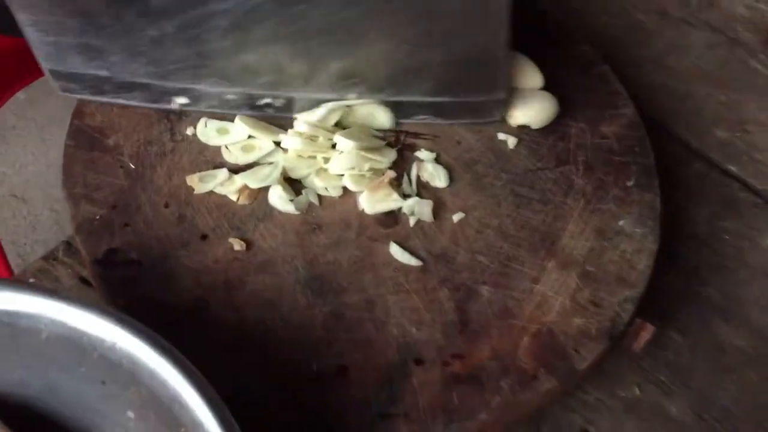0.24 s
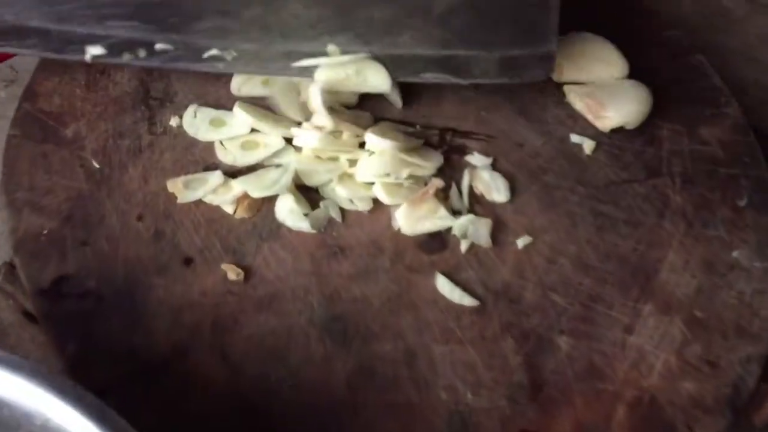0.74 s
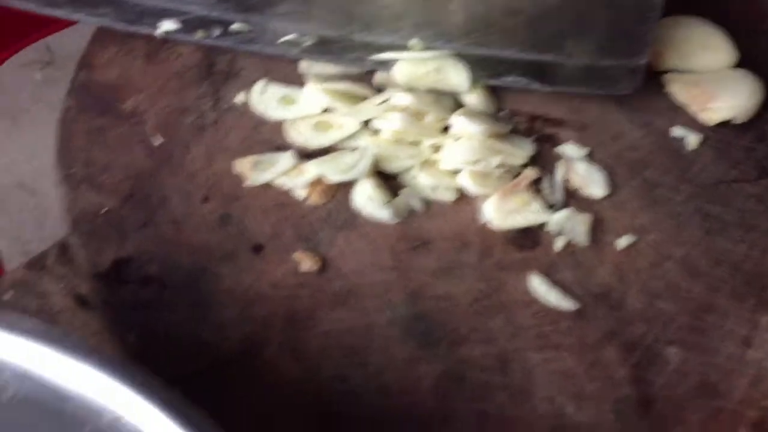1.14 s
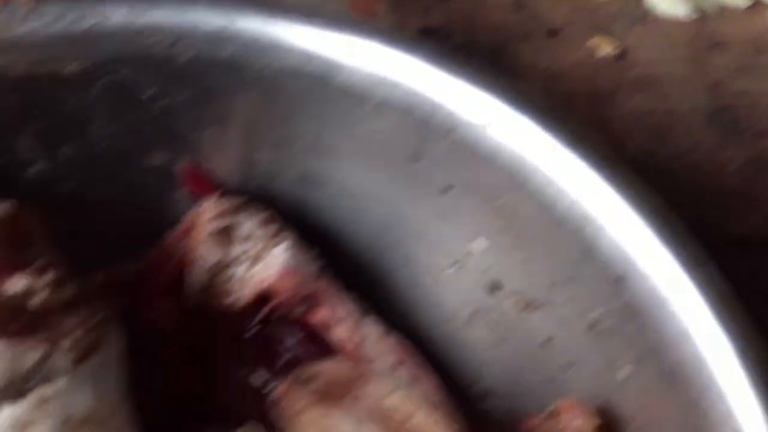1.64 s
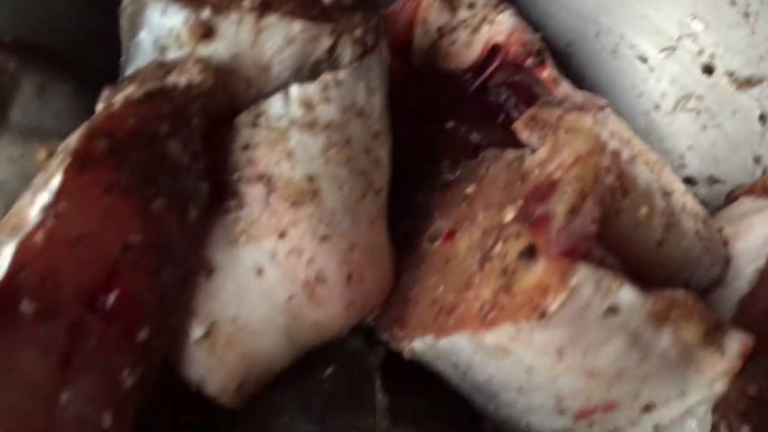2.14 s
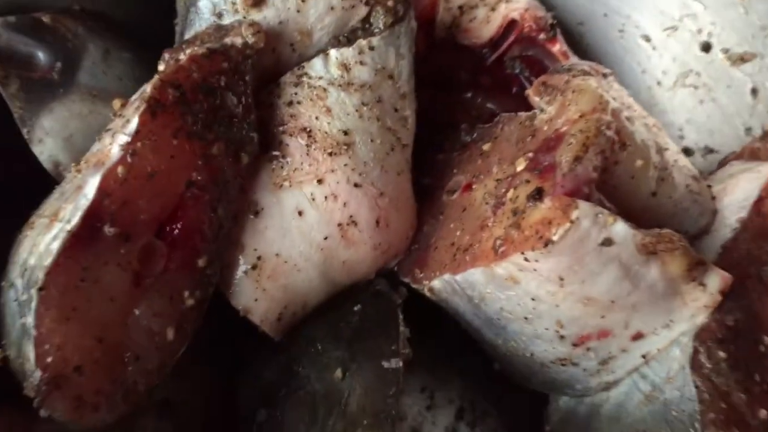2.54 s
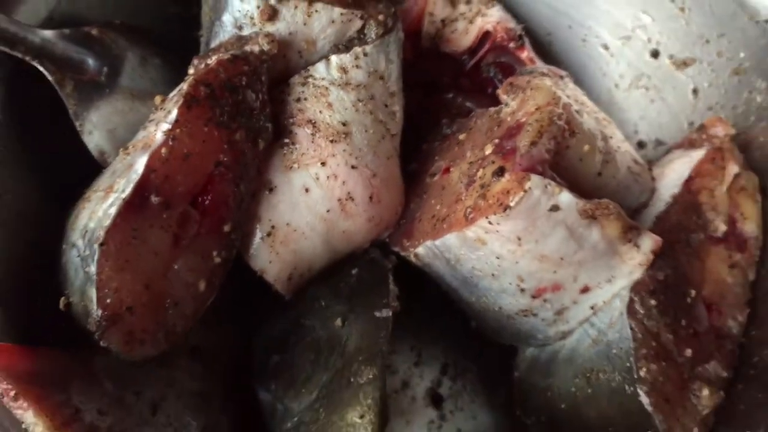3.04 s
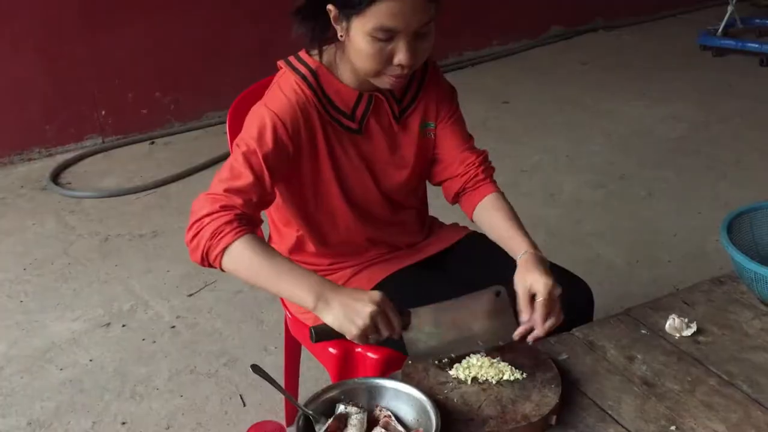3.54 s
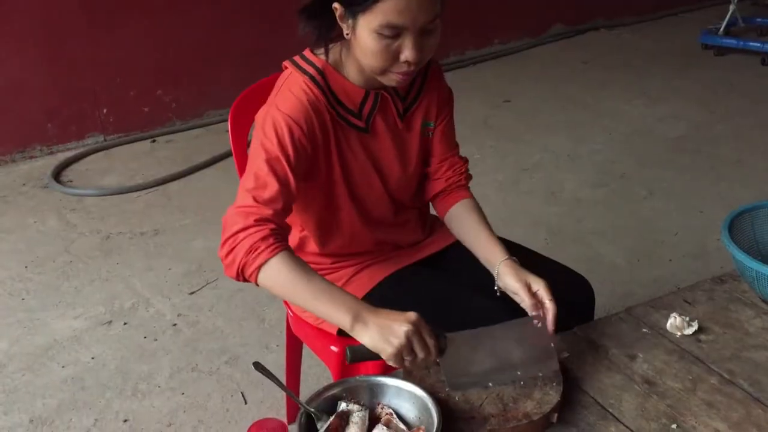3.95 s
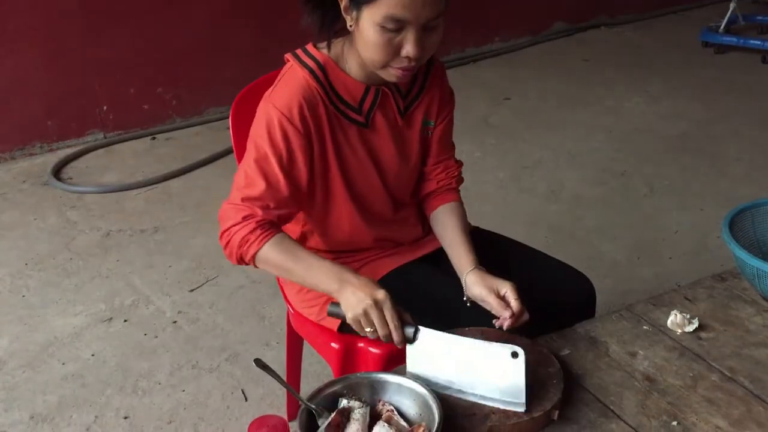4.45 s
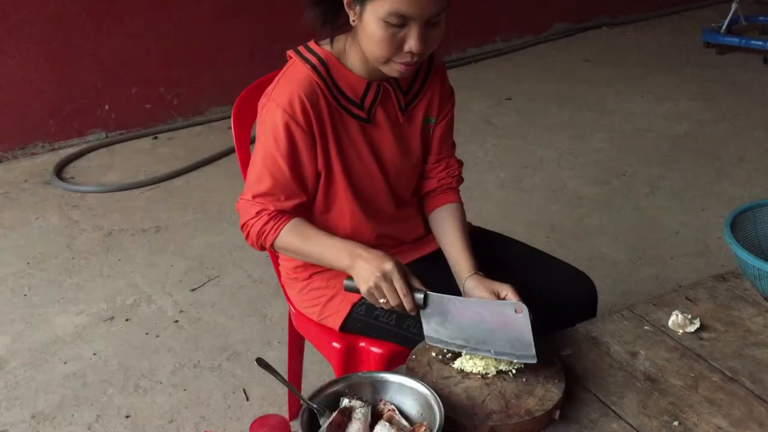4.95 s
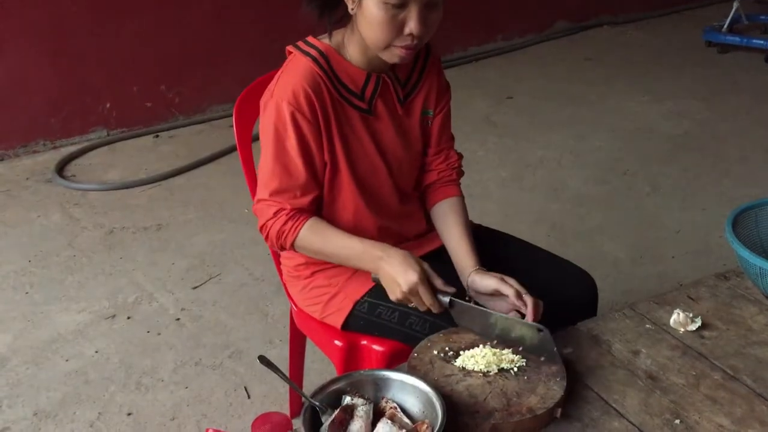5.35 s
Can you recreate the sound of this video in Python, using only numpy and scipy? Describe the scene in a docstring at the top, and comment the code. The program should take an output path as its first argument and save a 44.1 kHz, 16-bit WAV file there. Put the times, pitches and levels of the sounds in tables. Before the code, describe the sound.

A cleaver crunches through garlic and knocks hard on a wooden board while chicks peep constantly, then softer chops and scrapes from farther away.

```python
"""Slicing garlic with a cleaver in an open shed

A steel cleaver crunches through garlic (showers of tiny fractures) and knocks on a round wooden board (ringing modes).
After a moment of silence it is heard from farther off, tapping the board and scraping across it (stick and slip).
Chicks peep and other birds whistle as gliding tones; a distant hen squawks as rough pulses through a throat.
A diffuse echo surrounds them, over a low outdoor rumble and thin air of shaped noise, with a rush that fades away."""
import sys
import numpy as np
from scipy import signal
from scipy.fft import rfft, irfft, next_fast_len
from scipy.io import wavfile
from scipy.ndimage import uniform_filter1d

SR = 44100
rng = np.random.default_rng(int(sys.argv[2]) if len(sys.argv) > 2 else 0)


def master_out(mix):
    """Clip the mix to full scale and print it as 16-bit PCM to the path in sys.argv[1]."""
    frames = np.transpose(np.atleast_2d(mix))
    ceiling = np.clip(frames, -1, 1)
    pcm = np.round(ceiling * 32767).astype(np.int16)
    wavfile.write(sys.argv[1], SR, pcm)


N = 246078
TIME = np.arange(N) / SR
SILENCE_START_S, SILENCE_END_S = 3.370, 3.416

# free ringing tones of the steel blade: [f/Hz, relative level/dB]
BLADE_TONES = [(1023, -53), (1448, -60), (1674, -56), (2309, -64), (2428, -65), (2697, -56), (2955, -67),
               (3138, -56), (3214, -60), (3553, -62), (3723, -60), (4140, -50), (4737, -65), (5604, -69),
               (6471, -71), (6715, -69), (7214, -73), (7827, -71), (7935, -66), (8732, -73), (11190, -80),
               (11680, -79), (12588, -73), (13680, -80)]


def amp(db):
    """Turn decibels into a plain gain."""
    return 10 ** (np.asarray(db) / 20)


def unit(x):
    """Scale to rms 1."""
    return x / np.sqrt(np.mean(x ** 2) + 1e-20)


def at_hz(points, hz):
    """Read a table between its rows, on a log-frequency axis."""
    f, value = np.transpose(points)
    return np.interp(np.log(np.maximum(hz, 1)), np.log(f), value)


def tint(x, spectrum):
    """Boost and cut each frequency as a table says; rms 1."""
    size = next_fast_len(len(x))
    gain = amp(at_hz(spectrum, np.fft.rfftfreq(size, 1 / SR)))
    return unit(irfft(rfft(x, size) * gain, size)[:len(x)])


def noise(spectrum, size=N):
    """Random hiss coloured by a table; rms 1."""
    return tint(rng.standard_normal(size), spectrum)


def wander(rate, size=N):
    """Random drift around 0 with a spread of about 1: straight lines between `rate` random points a second."""
    steps = np.arange(size) / SR * rate
    return np.interp(steps, np.arange(4096), rng.standard_normal(4096))


def decay(t, t60):
    """Dying away by 60 dB in t60 seconds."""
    return np.exp(-np.log(1000) * t / t60)


def add(track, s, sound):
    """Lay a sound into a track at a time in seconds."""
    i = round(s * SR)
    part = sound[max(-i, 0):max(N - i, 0)]
    track[max(i, 0):max(i, 0) + len(part)] += part


def resonate(x, hz, width):
    """Two-pole resonance, width in Hz, with gain 1 on top."""
    r = np.exp(-np.pi * width / SR)
    feedback = [1, -2 * r * np.cos(2 * np.pi * hz / SR), r * r]
    return signal.lfilter(np.array([1, 0, -1]) * (1 - r * r) / 2, feedback, x)


def grains(per_s, spread_db):
    """Tiny fractures at random moments and of uneven size; rms 1."""
    hits = rng.random(N) < per_s / SR
    size = rng.standard_normal(N) * amp(spread_db * np.minimum(rng.exponential(1, N), 4))
    return unit(hits * size)


def stroke(s, hold_s, attack_db_per_s, release_db_per_s):
    """Gain that rises until s, holds at 1 and is released."""
    before_s = np.maximum(s - TIME, 0)
    after_s = np.maximum(TIME - s - hold_s, 0)
    return amp(-attack_db_per_s * before_s - release_db_per_s * after_s) + 1e-12


def chops(wood_t60=0.092, steel_t60=0.42, steel_hz=2950, steel_octaves=0.27, contact_s=0.0019,
          bite=1.15, bite_s=0.0064, scatter_db=4, detune=0.0072):
    """Each blow rings the board's modes; where and how hard the edge lands sets their balance and shifts them a little."""
    # edge meets board, a loose blow bouncing once or twice, relative levels:
    # [t/s, low thump/dB, wood knock/dB, ring/dB, crack/dB, free ringing of the steel/dB]
    blows = [(.3310, -20, -23, -20.5, -46, 2), (1.9994, -17, -16.5, -23, -34.5, 3),
             (2.5730, -15, -17, -11, -19.5, -6), (3.2410, -18, -25, -15, -48, -16),
             (3.9780, -38, -31, -43.5, -36, -12), (3.9922, -48, -33.5, -55, -60, -18),
             (4.003, -38, -35, -50, -57, -23), (4.4873, -32.5, -25, -28, -30, -8),
             (4.4945, -39, -30, -31, -49, -18), (5.4724, -33.5, -31.5, -35, -37.5, 12),
             (5.4874, -39, -38.5, -51, -44, -18)]
    # ringing modes of board and stand under the blade: [f/Hz, relative level/dB, time to die by 60 dB/s]
    board_modes = [(109.4, -10.5, 0.16), (202.6, -1.5, 0.044), (274, 2, 0.036), (384, -4, 0.068),
                   (465.5, -6.5, 0.1), (612, -5, 0.06), (657, 2.5, 0.026), (830, -3.5, 0.057),
                   (1015, -3, 0.025), (1098, 4, 0.042), (1177.8, 5, 0.053), (1314, -5, 0.097),
                   (1584, -9, 0.11), (2050, -7, 0.089), (2365, -6.5, 0.053), (2740, -19.5, 0.083),
                   (2840, -8, 0.06)]
    # dense, quickly damped modes of the wood: [f/Hz, relative level per Hz/dB]
    wood_colour = [(60, -17), (200, 2.5), (700, 2.5), (1200, 0.5), (1900, 3), (2600, -1), (4000, -9.5),
                   (7000, -27), (15000, -67)]
    # dense wood modes/dB, room/dB
    close, farther = (-3, -20), (0.32, -11.5)

    near, far, t = np.zeros(N), np.zeros(N), TIME[:SR // 2]
    # the steel rings on faintly: the hand damps its low modes, soft wood hardly wakes the high ones
    steel = 0
    for hz, db in BLADE_TONES:
        woken = np.exp(-(np.log2(hz / steel_hz) / steel_octaves) ** 2)
        steel = steel + amp(db) * woken * np.sin(2 * np.pi * hz * t)
    steel = steel * decay(t, steel_t60)
    # the first swings are the widest, until the edge beds in and damps them
    first_swings = (1 + bite * np.exp(-(t / bite_s) ** 4)) / np.sqrt(1 + bite)
    impact = (1 - np.exp(-t / contact_s)) * first_swings

    for s, thump_db, knock_db, ring_db, crack_db, steel_db in blows:
        wood_db, room_db = close if s < SILENCE_START_S else farther
        balance = [(280, thump_db), (470, knock_db), (850, knock_db), (1150, ring_db), (1900, crack_db)]
        modes = 0
        for hz, db, t60 in board_modes:
            level = amp(db + at_hz(balance, hz) + rng.normal(0, 1))
            modes = modes + level * np.sin(2 * np.pi * hz * rng.normal(1, detune) * t) * decay(t, t60)
        force = np.sqrt(np.mean(amp([knock_db, ring_db, crack_db]) ** 2))
        wood = tint(noise(wood_colour, size=len(t)), balance)
        thud = amp(wood_db) * force * wood * decay(t, wood_t60)
        blow = (modes + thud + amp(steel_db) * steel) * impact
        add(near, s, blow)
        # the dense modes radiate in all directions, so they weigh more in the echo
        add(far, s, (blow + amp(scatter_db) * thud) * amp(room_db))
    return near, far


def slicing(snap_db=9, snap_t60=0.014, burst_db=3, entry_s=0.0097, crackle_db=-2, crackle_t60=0.0033,
            build_db=3, release_db_per_s=796):
    """Garlic cells burst densely ahead of the edge, fibres crackle, and now and then the clove splits with a snap."""
    # edge working through a clove, push by push: [t at the end of the push/s, length/s, relative crunch level/dB]
    pushes = [(0.268, 0.053, -54.5), (0.339, 0.064, -47), (1.81, 0.045, -61), (1.97, 0.15, -54.5),
              (1.993, 0.0079, -41.5), (2.544, 0.036, -55), (2.574, 0.022, -43.5), (3.178, 0.041, -49),
              (3.248, 0.054, -43)]
    # a clove splits: [t/s, relative level/dB]
    splits = [(.2575, -55), (0.2798, -47), (0.2968, -45), (0.332, -38.5), (1.78, -66), (1.875, -51),
              (1.949, -51.5), (1.996, -44.5), (2.559, -59), (3.2046, -42), (3.2245, -49), (3.245, -41)]
    # colour of the crunch: [f/Hz, relative level per Hz/dB]
    crunch_colour = [(300, -5), (800, 2), (1250, 8), (1700, 1.5), (4000, 8.5), (6000, -0.5), (9000, -6.5),
                     (11700, -6.5), (13000, -14), (16000, -19)]

    t = TIME[:SR // 20]
    cells = grains(per_s=5600, spread_db=-4.0) * amp(burst_db * wander(40))
    crackles = signal.fftconvolve(grains(per_s=650, spread_db=8.5), decay(t, crackle_t60))[:N]
    fibres = crackles * rng.standard_normal(N)
    # the crunch grows as the edge sinks in, then dies
    effort = 0
    for s, length, db in pushes:
        entry = np.clip((TIME - s + length) / entry_s + 1, 0, 1)
        effort = effort + amp(db) * stroke(s, 0, build_db / length, release_db_per_s) * entry
    out = effort * tint(unit(cells) + amp(crackle_db) * unit(fibres), crunch_colour)
    for s, db in splits:
        add(out, s, amp(snap_db + db) * noise(crunch_colour, size=len(t)) * decay(t, snap_t60))
    return out


def scraping(rasp_db=7.0, steel_db=62.5, steel_width_hz=16, plate_width_hz=18, stutter_db=2.0, grip=2.3,
             count=110, attack_db_per_s=400, release_db_per_s=707):
    """Stick and slip on the grain drives the blade: a few clear modes sing above many damped ones, new each stroke."""
    # blade dragged over the board: [t/s, length/s, relative friction level/dB]
    drags = [(4.02, 0.12, -66), (4.604, 0.097, -59), (4.754, 0.03, -69), (5.527, .1, -65.5)]
    # colour of the friction: [f/Hz, relative level per Hz/dB]
    friction_colour = [(200, 7), (1000, 9), (2300, 15), (3500, 25), (4600, 26.5), (6500, 29), (8000, 25),
                       (10500, 14), (12000, 1), (13700, -20), (16000, -25)]

    slips = grains(per_s=9000, spread_db=3.0)
    stutter = amp(stutter_db * wander(70))
    out, pressure = np.zeros(N), 0
    for s, length, db in drags:
        push = amp(db) * stroke(s, length, attack_db_per_s, release_db_per_s) * stutter
        during = np.abs(TIME - s - length / 2) < .25
        # damped modes, one at a random pitch in each equal slot from 600 to 15600 Hz
        plate_hz = 600 + 15000 * (np.arange(count) + rng.random(count)) / count
        plate = 0
        for hz in plate_hz:
            gain = rng.choice([-1, 1]) * amp(rng.normal(0, 7.2))
            plate = plate + gain * resonate(slips[during], hz, plate_width_hz)
        out[during] += amp(rasp_db) * push[during] * tint(plate, friction_colour)
        pressure = np.maximum(pressure, push)
    # the clear modes speak only under a firm stroke
    drive = slips * pressure * np.minimum(pressure / amp(-62), 1) ** grip
    steel = sum(amp(db) * resonate(drive, hz, steel_width_hz) for hz, db in BLADE_TONES)
    return out + amp(steel_db) * steel * np.sqrt(SR / (np.pi * steel_width_hz))


def bowl(x):
    """The steel bowl beside the board rings in sympathy, heard only from close by; its close modes beat."""
    # ringing modes of the bowl: [f/Hz, width/Hz, relative level/dB]
    bowl_modes = [(1131, 2.2, -5), (1163, 4, -8)]
    ringing = sum(amp(db) * resonate(x, hz, width) for hz, width, db in bowl_modes)
    return ringing * (TIME < SILENCE_END_S)


def peep(crest_hz, fall_s, swoop_db, rise_s=0.03, rise_hz=287.5, fall_hz=2035, waver=0.0112, flutter_db=3,
         open_s=0.012, loudest_at=0.64, swell_width=0.27):
    """A near-pure tone that fades in as it arches over its crest and swells partway down its swoop; rms 1."""
    # low peeps slide down more evenly, high ones hold their crest and end in a hook: [crest f/Hz, power of the swoop]
    swoop_bend = [(5560, 1.5), (5800, 3.7)]
    t = np.arange(-rise_s, fall_s, 1 / SR)
    # up runs from 1 to 0 before the crest, down from 0 to 1 after it
    up, down = np.maximum(-t / rise_s, 0), np.maximum(t / fall_s, 0)
    glide_hz = crest_hz - rise_hz * up ** 2 - fall_hz * down ** at_hz(swoop_bend, crest_hz)
    hz = glide_hz * (1 + waver * wander(300.8, size=len(t)))
    swell = np.exp(-((down - loudest_at) / swell_width) ** 2)
    level_db = swoop_db * swell + flutter_db * wander(140.3, size=len(t))
    fade = np.minimum((t + rise_s) / (rise_s + open_s), 1) * (1 - down ** 7)
    return unit(amp(level_db) * fade * np.sin(2 * np.pi * np.cumsum(hz) / SR))


def chicks(rows, rise_s=0.03):
    """Lay out a series of peeps, each starting its short climb before the crest time."""
    out = np.zeros(N)
    for s, crest_hz, fall_s, db, swoop_db in rows:
        add(out, s - rise_s, amp(db) * peep(crest_hz, fall_s, swoop_db, rise_s))
    return out


def flock(db=-63, lowest_hz=5000, spread_hz=1050, fall_s=0.028, swoop_db=4, count=30):
    """More chicks farther off, each peeping at its own moment and pitch."""
    rows = []
    for k, (when, high) in enumerate(rng.random((count, 2))):
        s = (k + when) / count * N / SR
        rows.append((s, lowest_hz + spread_hz * high, fall_s, db, swoop_db))
    return chicks(rows)


def floor_bounce(x, lag_s=0.000456, gain=0.19):
    """A call from near the ground arrives twice, so a gliding tone swells and dips."""
    return x + gain * np.interp(TIME - lag_s, TIME, x, left=0)


def whistles(waver=0.012, flutter_db=4.5, fade_db=10, bend=1.5, sag_hz_per_s=3900):
    """A lower, quavering note sags, levels out and fades; the longer it lasts, the higher it starts above its end."""
    # lower, drawn-out bird whistles: [t/s, length/s, end f/Hz, relative level/dB]
    calls = [(0.35, 0.056, 2850, -63), (2.262, 0.062, 3040, -56), (3.418, 0.18, 2910, -57.5),
             (4.198, 0.056, 3380, -54), (4.321, 0.07, 3052, -46.5), (5.213, 0.17, 2977, -49)]
    out = np.zeros(N)
    for s, length, end_hz, db in calls:
        u = np.linspace(0, 1, int(length * SR))
        sag_hz = end_hz + sag_hz_per_s * length * (1 - u) ** bend
        hz = sag_hz * (1 + waver * wander(226.6, size=len(u)))
        level_db = db - fade_db * u ** 2 + flutter_db * wander(150, size=len(u))
        level = amp(level_db) * np.sqrt(np.abs(np.sin(np.pi * u)))
        add(out, s, level * np.sin(2 * np.pi * np.cumsum(hz) / SR))
    return out


def hen(jitter=0.02, arch=0.052, rasp=0.59):
    """Rough pulses of the syrinx (voice box) through the throat's resonances; pitch rises and sinks with the effort."""
    # distant squawks: [t/s, length/s, pitch f/Hz, relative level/dB]
    calls = [(0.035, 0.14, 424.3, -60), (0.814, 0.12, 434, -51.5), (1.45, 0.201, 376, -53)]
    # resonances of the throat: [f/Hz, width/Hz, relative level/dB]
    throat_modes = [(460, 63, -2), (1120, 180, 4), (1580, 140, 3.5), (2110, 150, 5.5), (3600, 300, 1.5)]
    out = np.zeros(N)
    for s, length, pitch_hz, db in calls:
        effort = np.abs(np.sin(np.linspace(0, np.pi, int(length * SR))))
        bend = 1 + arch * (effort - .75) + jitter * wander(120, size=len(effort))
        cycles = np.cumsum(pitch_hz * bend) / SR
        # one click per full cycle, plus breathy noise
        pulses = unit(np.diff(np.floor(cycles), prepend=0))
        source = pulses + rasp * rng.standard_normal(len(effort))
        voice = 0
        for k, (hz, width, gain_db) in enumerate(throat_modes):
            voice = voice + (-1) ** k * amp(gain_db) * resonate(source, hz, width)
        add(out, s, amp(db) * effort ** 0.51 * unit(voice))
    return out


def shed(x, build_s=0.0011, wall_s=.066, wall_gain=0.33, wall_spread_s=0.016):
    """Diffuse echo of roof and walls, each octave dying at its own pace; a far wall sends back a second wave."""
    # colour of the echo: [f/Hz, relative level/dB]
    echo_colour = [(60, 8), (250, 10.5), (550, -1.5), (1100, 3.5), (4500, -3.5), (7000, -11), (16000, 10)]
    # how long the echo lasts: [f/Hz, time to die by 60 dB/s]
    echo_t60 = [(100, 0.25), (500, 0.56), (1200, 0.64), (4000, 0.77), (8000, 0.37), (16000, 0.12)]
    t = TIME[:SR]
    hiss, tail = noise(echo_colour, size=SR), 0
    for hz in 88 * 2. ** np.arange(8):  # octave bands
        band = signal.butter(2, [hz / np.sqrt(2), hz * np.sqrt(2)], "band", fs=SR, output="sos")
        tail = tail + signal.sosfiltfilt(band, hiss) * decay(t, at_hz(echo_t60, hz))
    second_wave = wall_gain * (t > wall_s) * np.exp(-np.abs(t - wall_s) / wall_spread_s)
    tail = tail * (1 - np.exp(-t / build_s)) * (1 + second_wave)
    return signal.fftconvolve(x, tail / np.sqrt(2 * np.sum(tail ** 2)))[:N]


def background(rumble_db=2, air_db=-9.0, rush_db=-43, rush_hold_s=0.078, rush_fade_db_per_s=8.5,
               rush_flicker_db=1.5):
    """Low rumble and thin air that swell together, and a broad rush that holds briefly after the silence and fades."""
    # shared swell of rumble and air: [t/s, relative level/dB]
    outdoor_swell = [(0.0, -49), (0.99, -52.5), (3.19, -47), (5.13, -53.5), (5.58, -50.5)]
    # colours of the three noises, each: [f/Hz, relative level per Hz/dB]
    rumble_colour = [(20, -33), (32, 5), (50, 5), (75, 2.5), (120, 2.5), (200, -5), (300, -13), (500, -29),
                     (1000, -50)]
    air_colour = [(200, -8), (500, -4), (1100, -2.5), (2200, -10), (3000, -8), (4000, -1), (5500, -20.5),
                  (6800, -22), (10000, -38), (16000, -59)]
    rush_colour = [(200, -3.5), (400, -7.5), (750, -1.5), (1300, 1.5), (1700, 4), (2500, -9), (4000, -21.5),
                   (6000, -22), (9000, -84)]

    outdoors_db = np.interp(TIME, *np.transpose(outdoor_swell))
    rumble = amp(rumble_db + outdoors_db + 3.14 * wander(12)) * noise(rumble_colour)
    air_sway_db = 1.5 * wander(6)
    air = amp(air_db + outdoors_db + air_sway_db) * noise(air_colour)
    rush_fade = (TIME > SILENCE_START_S) * stroke(SILENCE_END_S, rush_hold_s, 0, rush_fade_db_per_s)
    rush = amp(rush_db) * rush_fade * noise(rush_colour) * amp(rush_flicker_db * wander(45))
    return rumble + air + rush


def scene():
    """The board is near; the birds are heard as much by their echo as directly, the far ones by their echo alone."""
    # chick peeps: [t at the crest/s, crest f/Hz, length of the swoop/s, relative level/dB, swoop over crest level/dB]
    peep_rows = [(-.045, 5220, 0.08, -45, -2), (-.02, 5724, 0.062, -49.5, 8), (.257, 5560, 0.1, -47, 11),
                 (.652, 5560, 0.1, -46.5, 12), (1.16, 5500, 0.092, -47, 13), (1.34, 5850, 0.026, -63, -14),
                 (1.55, 5435, 0.096, -48, 14), (1.775, 5735, 0.044, -54.5, 8), (1.89, 5520, 0.084, -51, 7),
                 (2.095, 5750, 0.067, -51.5, -3), (2.24, 5500, 0.1, -50, 12.5),
                 (2.405, 5790, 0.059, -49, -6), (2.695, 5160, 0.086, -52.5, -3),
                 (2.735, 5820, 0.068, -50.5, 5), (3.06, 5895, 0.092, -47, 7.5),
                 (3.09, 5160, 0.085, -54.5, 8), (3.445, 5900, .06, -59, 2), (3.49, 5580, 0.067, -63, 9),
                 (3.705, 5700, 0.083, -57.5, -1), (3.872, 5680, 0.08, -54, 5),
                 (3.935, 5830, 0.087, -58.5, -3), (4.07, 5540, 0.097, -61, 7),
                 (4.262, 5640, 0.075, -52.5, 5), (4.295, 5890, 0.054, -57.5, 9), (4.4, 5560, 0.08, -57, 20),
                 (4.495, 5760, 0.067, -54.5, -4), (4.725, 5660, 0.082, -55, -2),
                 (5.052, 5810, 0.052, -53.5, -3), (5.09, 5430, 0.085, -57.5, 15),
                 (5.268, 5910, 0.052, -57.5, 1), (5.508, 5830, 0.061, -55.5, -4)]
    knocks, knocks_far = chops()
    crunch, scrape, squawks = slicing(), scraping(), hen()
    peeps, notes = chicks(peep_rows), whistles()

    direct = knocks + bowl(knocks + crunch + squawks) + crunch + scrape
    direct = direct + amp(-4) * floor_bounce(peeps) + amp(1.5) * notes + amp(-0.5) * squawks

    to_echo = knocks_far + amp(-5) * crunch + amp(-2.5) * scrape
    to_echo = to_echo + amp(4) * peeps + amp(3.5) * notes + flock() + amp(2.0) * squawks
    return (direct + shed(to_echo) + background())[None, :]


def record(dry, low_cut_hz=54.4, cutoff_hz=15850):
    """The microphone loses the deepest bass, the sound drops out for a moment, the top is cut."""
    heard = signal.sosfilt(signal.butter(3, low_cut_hz, "high", fs=SR, output="sos"), dry)
    sounding = (TIME < SILENCE_START_S) | (TIME > SILENCE_END_S)
    live = uniform_filter1d(1. * sounding, size=200)  # soft edges, 200 samples long
    top_cut = signal.ellip(12, .1, 80, cutoff_hz, fs=SR, output="sos")
    return signal.sosfilt(top_cut, heard * live)


dry = scene()
out = record(dry)
master_out(out)
```